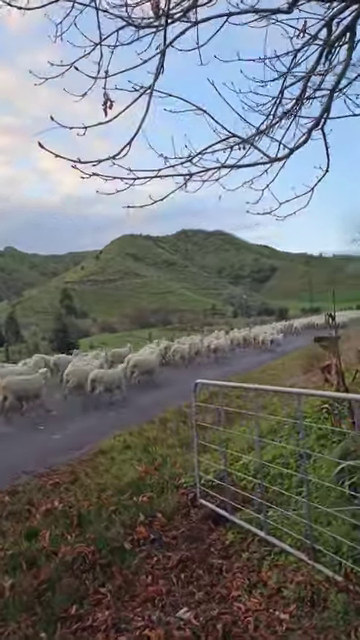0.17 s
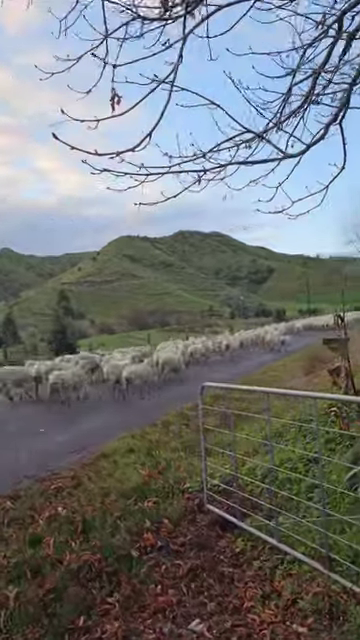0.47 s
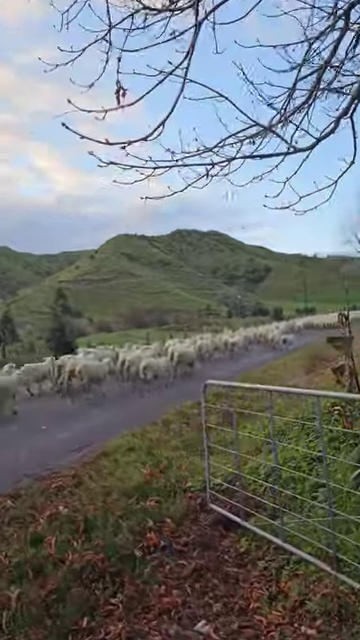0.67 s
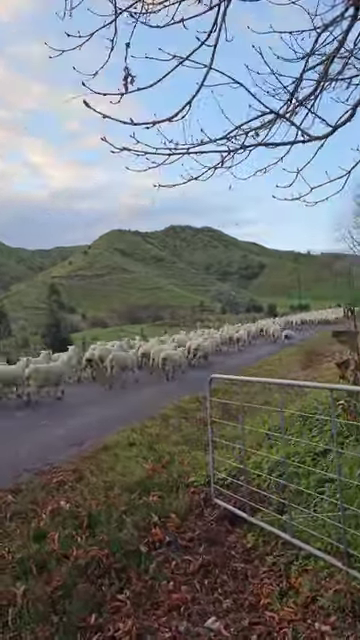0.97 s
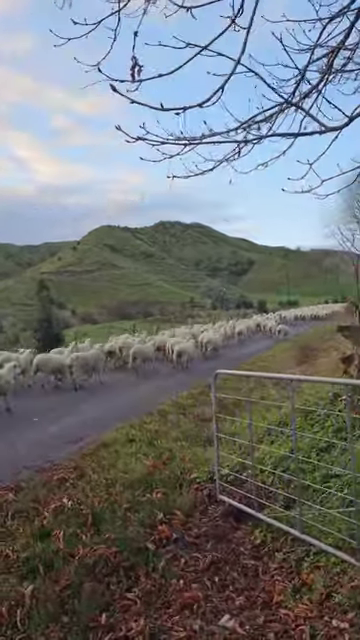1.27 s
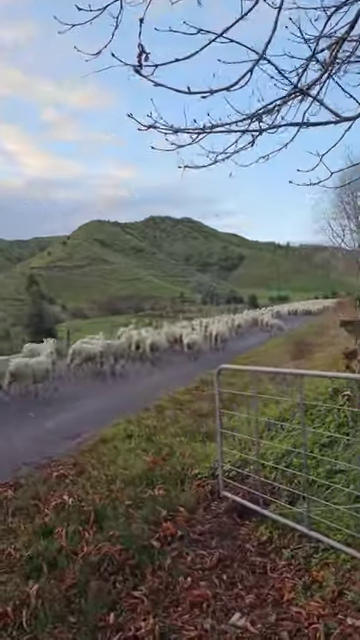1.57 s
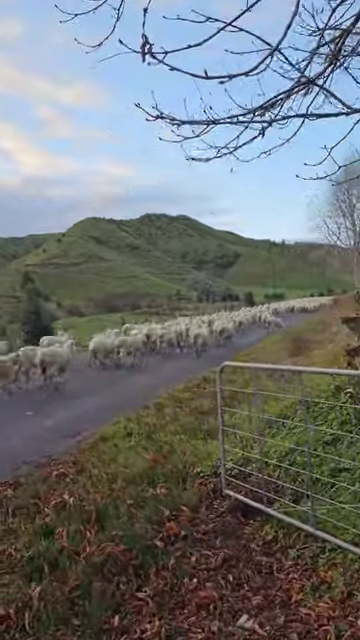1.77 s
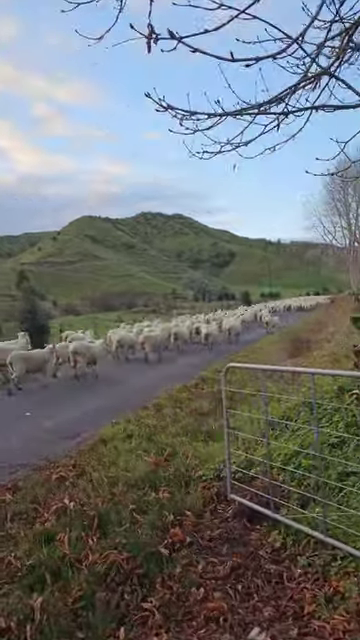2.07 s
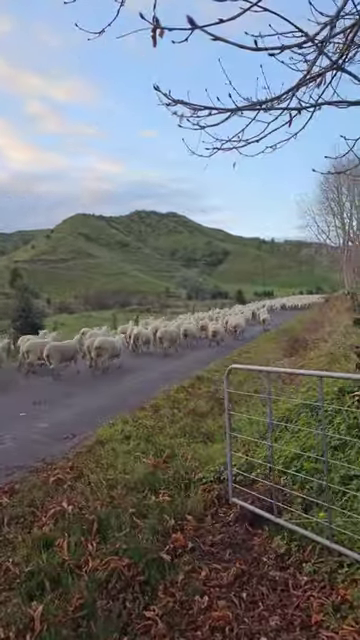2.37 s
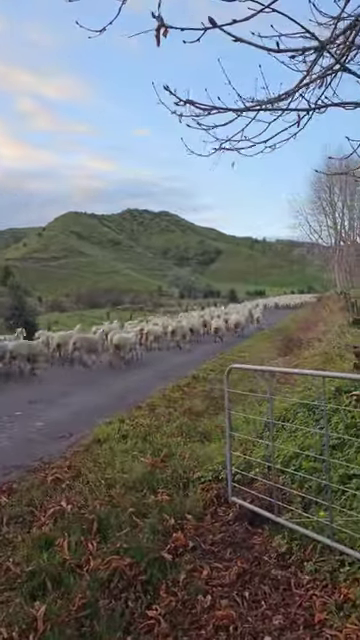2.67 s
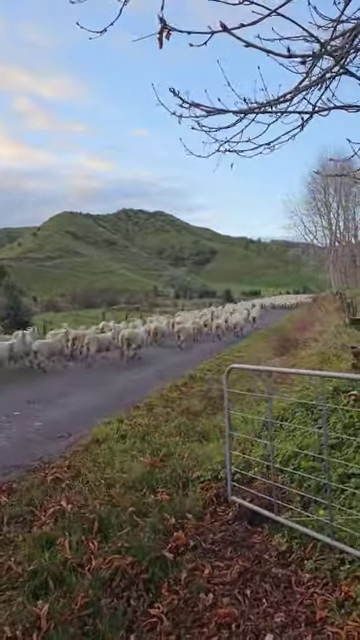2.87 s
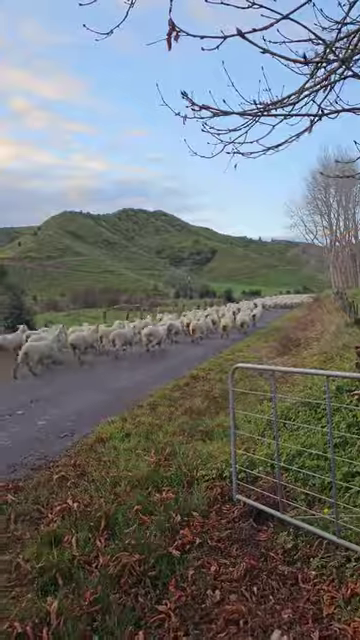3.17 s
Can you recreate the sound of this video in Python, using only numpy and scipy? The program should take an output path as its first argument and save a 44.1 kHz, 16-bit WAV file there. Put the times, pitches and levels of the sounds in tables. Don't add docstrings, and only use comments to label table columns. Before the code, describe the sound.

Sheep hooves patter in a dense clopping flock along an asphalt lane over low engine rumble.

```python
import sys
import numpy as np
from scipy import signal
from scipy.fft import rfft, irfft, next_fast_len
from scipy.io import wavfile
from scipy.ndimage import map_coordinates

SR = 44100
rng = np.random.default_rng(int(sys.argv[2]) if len(sys.argv) > 2 else 0)


def how_loud(loudness_db):
    steps = np.asarray(loudness_db, float) / 20
    return 10 ** steps


def digitize_waveform(pressure):
    field = np.atleast_2d(pressure).T
    bounded = np.clip(field, -1, 1)
    quanta = np.round(bounded * 32767).astype(np.int16)
    wavfile.write(sys.argv[1], SR, quanta)


N = 145971
HOOF_LATE_S = .0008


def unit(x):
    return x / np.sqrt(np.mean(x ** 2) + 1e-20)


def along(points, hz):
    f, v = np.transpose(points)
    return np.interp(np.log(hz + 1), np.log(f + 1), v)


def curves(rows):
    s, *cols = np.transpose(rows)
    return [np.interp(np.arange(N) / SR, s, c) for c in cols]


def wobble(rate):
    knots = rng.standard_normal(int(N * rate / SR) + 4)
    return map_coordinates(knots, [np.arange(N) * rate / SR])


def filtered(x, response):
    m = next_fast_len(N + SR // 2)
    return irfft(rfft(x, m) * response(np.fft.rfftfreq(m, 1 / SR)), m)[..., :N]


def coloured(spectrum, channels):
    noise = rng.standard_normal((channels, N))
    return unit(filtered(noise, lambda hz: how_loud(along(spectrum, hz))))


def clops(s, gain, hz, cycles, rise_s):
    t = np.arange(600)[None] / SR
    fall = how_loud(-30 * (t * hz[:, None] / cycles) ** 1.12)
    rise = 1 - np.exp(-t / rise_s)
    rings = gain[:, None] * np.sin(2 * np.pi * hz[:, None] * t) * fall * rise
    at = np.round(s * SR).astype(int)[:, None] + np.arange(t.size)
    return np.bincount(at.ravel(), rings.ravel(), N + t.size)[:N]


def stroke(rows):
    t = np.arange(N) / SR
    level = 0
    for s, db, length in rows:
        ramp = np.minimum(t - s, (s + length - t) / 2) * 6 / length
        level = level + how_loud(db) * np.clip(ramp, 0, 1)
    return level


# frequency in Hz, left over right in dB.
SHADOW = [(60, -8), (180, 2), (550, -1), (1650, -2.5), (4970, -5), (15000, -2)]


def placed(x, lag_s, shadow):
    def half(hz):
        return how_loud(shadow * along(SHADOW, hz) / 2) * np.exp(-1j * np.pi * hz * lag_s)
    return filtered(x, lambda hz: np.array([half(hz), 1 / half(hz)]))


# time in seconds, shaft speed in Hz, exhaust tone in dB, low rumble in dB.
ENGINE_RUN = [(0, 28.36, -54.5, -42.5), (.35, 28.92, -47, -39.5), (.7, 29.86, -47, -41.5),
              (1.05, 30.52, -47.5, -38.5), (1.4, 31.36, -45.5, -42.5), (1.75, 32.25, -46.5, -40.5),
              (2.15, 33.04, -43, -39), (2.4, 33.47, -48, -40.5), (2.7, 33.84, -44.5, -38),
              (3, 34.62, -45.5, -40.5), (3.31, 35.18, -46, -40)]
# multiple of shaft speed, level over the fourth in dB, unsteadiness in dB.
ENGINE_ORDERS = [(1.5, -5.5, -2.5), (2, -1, 2), (2.5, -4, -2), (3, -4.5, 1), (4, 0, 2), (5, -8.5, 2.5),
                 (6, -20, 8), (7, -19.5, 5)]
# frequency in Hz, density in dB per Hz.
RUMBLE_COLOUR = [(12, -50), (20, -15.5), (49, 3), (80, 0.5), (138, -5), (198, -12), (261, -12.5),
                 (331, -27.5), (400, -32.5), (520, -28), (880, -120)]


def engine():
    hz, exhaust_db, low_db = curves(ENGINE_RUN)
    turn = 2 * np.pi * np.cumsum(hz) / SR
    tones = 0
    for multiple, db, sway_db in ENGINE_ORDERS:
        base_db = exhaust_db if multiple > 3.5 else low_db - 5
        level = how_loud(base_db + db + sway_db * wobble(4.23)) * np.sqrt(2)
        tones = tones + level * np.sin(multiple * turn + rng.uniform(0, 2 * np.pi))
    rumble_db = -3 + .6 * low_db + .4 * low_db.mean()
    mid, side = coloured(RUMBLE_COLOUR, channels=2) * how_loud(rumble_db)
    side = side * how_loud(-17)
    return tones + np.array([mid + side, mid - side])


# frequency in Hz, density in dB per Hz.
GRIT_COLOUR = [(120, -16.5), (200, -8), (879, -12.5), (1310, -14), (4990, -19), (7470, -22), (10400, -26),
               (14700, -24.5), (15800, -30)]


def herd(count):
    draw = rng.random((count, 4))
    s = draw[:, 0] * N / SR
    clop_hz = 923 * np.exp(0.57 * 3.28 * (draw[:, 2] - .5))
    hollow = unit(clops(s, how_loud(9 * draw[:, 1] ** 2), clop_hz, cycles=1.02, rise_s=.0004))

    t = np.arange(SR // 10) / SR
    hits = np.bincount((s * SR).astype(int), how_loud(9.6 * draw[:, 2] ** 2.5), N)
    rub_shape = np.exp(-((t - .03) * 5 / .022) ** 2)
    bursts = signal.fftconvolve(hits, rub_shape)[:N] * how_loud(1.9 * wobble(400))
    rub = unit(bursts * coloured(GRIT_COLOUR, channels=1)[0])

    tick_s = (s + .004) % (N / SR)
    tick_hz = 1830 * np.exp(1.1 * (draw[:, 1] - .5))
    tick = unit(clops(tick_s, how_loud(10 * draw[:, 3] ** 2.5), tick_hz, cycles=2.2, rise_s=.0002))
    return how_loud(-3) * tick + how_loud(-1.5) * hollow + how_loud(1) * rub


# time in seconds, level in dB.
FLOCK_LEVEL = [(0, -55), (.2, -55.5), (.45, -56), (.65, -56), (.9, -55.5), (1.15, -54.5), (1.4, -54),
               (1.62, -57.5), (1.85, -53), (2.1, -53.5), (2.35, -53.5), (2.55, -52.5), (2.8, -52.5),
               (2.97, -55), (3.15, -52), (3.31, -54)]
# left lag in seconds, share in dB, strength of the shadow as a factor.
HERD_SIDES = [(.0005, -2.5, 3.06), (.00011, 1.5, 0.093), (-.0002, 0, 0.18)]


def flock():
    level_db, = curves(FLOCK_LEVEL)
    crowd = sum(how_loud(db) * placed(herd(count=380), lag_s, shadow) for lag_s, db, shadow in HERD_SIDES)

    def alike(hz):
        return 1 / (1 + (hz / 1560) ** 2)

    def diffuse(hz):
        return np.sqrt(1 - alike(hz)) * how_loud(np.outer([.5, -.5], along(SHADOW, hz)))

    far = filtered(coloured(GRIT_COLOUR, channels=2), diffuse)
    common = filtered(coloured(GRIT_COLOUR, channels=1)[0], lambda hz: np.sqrt(alike(hz)))
    far = far + placed(common, 0.00053, 0.74)
    return how_loud(level_db + 0.7 * wobble(14)) * (0.57 * crowd + how_loud(1) * far)


# start in seconds, peak in dB, pitch in Hz.
EDGE_TICKS = [(0.0463, -39, 2900), (0.0722, -37, 2970), (0.14, -39, 3190), (0.3224, -40, 3200),
              (0.5312, -37, 3030), (0.7083, -36, 3030), (0.7527, -36, 3100), (0.841, -41, 3000),
              (0.9183, -35, 3120), (1.0774, -37, 4020), (1.1308, -42, 3270), (1.163, -35, 3070),
              (1.284, -44, 2900), (1.3053, -35, 2980), (1.3912, -32, 3130), (1.5369, -41, 2860),
              (1.626, -36, 3130), (1.6955, -31, 2995), (1.739, -34, 4170), (1.745, -36, 4240),
              (1.8547, -33, 3400), (1.9485, -54, 2500), (2.0797, -38, 3600), (2.3526, -46, 3170),
              (2.385, -21, 4333), (2.4524, -32, 3600), (2.5073, -39, 2650), (2.6045, -31, 3860),
              (2.667, -34, 2990), (2.7003, -41, 3170), (2.7154, -44, 3523), (2.7724, -36, 3100),
              (2.7923, -40, 2990), (2.8105, -33.5, 2920), (2.8448, -52, 3940), (2.8647, -41, 4430),
              (2.8777, -32, 3180), (2.9814, -38.5, 2860), (3.046, -33, 3080), (3.083, -36, 2840),
              (3.1133, -43, 3430), (3.1554, -34, 2510), (3.1841, -35, 2920)]
# start in seconds, peak in dB.
STONE_SNAPS = [(0.1506, -50), (0.7097, -32.5), (0.8046, -40), (0.8255, -31), (0.8407, -31), (1.0844, -43),
               (1.0999, -31), (1.2855, -50), (1.3912, -42), (1.7395, -46), (1.931, -38), (1.949, -40),
               (2.101, -32), (2.152, -34), (2.256, -40), (2.3595, -41), (2.385, -22), (2.5375, -31),
               (2.6628, -48), (2.8649, -43), (2.9173, -44), (3.0031, -32), (3.1136, -34), (3.2313, -38)]


def ticks():
    s, db, hz = np.transpose(EDGE_TICKS)
    s = s + HOOF_LATE_S
    ring = clops(s, how_loud(db + 5), hz, cycles=4, rise_s=.0003)
    click = clops(s, how_loud(db + 6), 1.4 * hz, cycles=2, rise_s=.0002)
    s, db = np.transpose(STONE_SNAPS)
    snap_hz = 7600 * np.exp(0.053 * rng.standard_normal(len(s)))
    snap = clops(s + HOOF_LATE_S, how_loud(db + 3), snap_hz, cycles=6, rise_s=0.00022)
    return placed(ring + click, .0001, 1.5) + placed(snap, .00016, 1.8)


# start in seconds, peak in dB, share of fine grit from 0 to 1.
GRIT_SCUFFS = [(0.1508, -53, 0.2), (0.808, -47, 0.55), (0.9163, -57, 0.17), (1.1, -49, 0.54),
               (1.162, -42, 0.5), (1.286, -41.5, 0.94), (1.305, -39, 0), (1.392, -45, 0.1),
               (1.854, -39, 0.2), (1.9492, -42, 0.65), (2.08, -41, 0.2), (2.1025, -55, 0.7),
               (2.1505, -33, 0.43), (2.36, -37, 0.55), (2.383, -41, 0.8), (2.664, -39.5, 0.7),
               (2.865, -39, 0.16), (2.92, -48, 1), (3.0006, -52, 0.78), (3.047, -40, 0.33),
               (3.1142, -36, 0.24), (3.2298, -35.5, 0.7)]
# start in seconds, level in dB, length in seconds, share of fine grit from 0 to 1.
HOOF_DRAGS = [
    (1.7305, -38.5, .024, .3),
    (1.752, -47, .015, .4),
    (.39, -58, .2, 1),
    (2.42, -53, .15, .9),
    (2.27, -56, .06, .6),
    (1.698, -53, .016, .05),
]


def rubs():
    t = np.arange(N) / SR

    def band(lo_hz, hi_hz):
        grit = coloured(GRIT_COLOUR, channels=1)[0]
        return unit(filtered(grit, lambda f: f ** 3 / (f ** 3 + lo_hz ** 3) / (1 + (f / hi_hz) ** 3)))

    coarse, fine, dull = band(2700, 5600), band(7500, 18000), band(350, 1800)

    def mix(share):
        return (1 - share) * coarse + share * fine

    crackle = unit(how_loud(3.5 * wobble(700)))
    quick = 0
    for s, db, share in GRIT_SCUFFS:
        length_s = .007 / how_loud(.5 * (db + 45.5))
        quick = quick + how_loud(db) * np.exp(-((t - s - .002) * 2 / length_s) ** 2) * mix(share)
    drags = 0
    for s, db, length, share in HOOF_DRAGS:
        drags = drags + stroke([(s, db, length)]) * (mix(share) + (1 - share) * how_loud(3) * dull)
    return placed(how_loud(-4) * quick * crackle, .00012, 1.7) + placed(drags * crackle ** .7, .00051, 2.3)


# start in seconds, peak in dB, pitch in Hz.
NEAR_KNOCKS = [(0.233, -42, 1130), (0.2652, -36, 2140), (0.305, -32, 1280), (0.3723, -45, 1360),
               (0.3953, -37, 1600), (1.0141, -39.5, 1240), (1.2588, -27.5, 1070), (1.2997, -29, 1120),
               (1.3128, -37, 2120), (1.3149, -29, 1180), (1.3236, -33, 1250), (1.3472, -39, 1210),
               (1.3595, -31.5, 1230), (1.5238, -42.5, 1280), (1.6768, -42, 1550), (1.6884, -36.5, 1250),
               (1.806, -41.5, 1330), (2.0823, -38, 1150), (2.1331, -35, 1180), (2.1515, -36, 1190),
               (2.16, -40, 1520), (2.1641, -37, 1450), (2.189, -36, 1296), (2.217, -34.5, 1360),
               (2.2554, -18.5, 1440), (2.4515, -40, 1340), (2.6045, -39.5, 1292), (2.8642, -39, 1319),
               (3.076, -42, 1410), (3.1146, -34.5, 1330)]
# start in seconds, peak in dB, pitch in Hz.
LIGHT_TAPS = [(0.345, -45, 1020), (0.38, -44, 1550), (0.663, -42, 1310), (0.697, -46, 1350),
              (0.751, -55, 1270), (1.077, -42, 1300), (1.283, -38, 1190), (1.47, -57, 867),
              (1.606, -46, 1510), (1.647, -44.5, 1280), (1.948, -40, 982), (2.039, -44, 1230),
              (2.052, -38, 1956), (2.168, -32.5, 1530), (2.3, -46, 1340), (2.36, -45, 1350),
              (2.473, -42, 1380), (2.497, -45, 1280), (2.511, -43, 894), (2.536, -51, 996),
              (2.616, -43, 895), (2.682, -55, 860), (2.701, -58, 892.4), (2.775, -43, 1020),
              (3.045, -41, 1350)]
# start in seconds, peak in dB, pitch in Hz.
LOW_THUDS = [(0.884, -33, 540), (0.915, -35, 528), (1.188, -33, 525), (1.258, -39, 530), (1.647, -33, 525),
             (1.739, -51, 507), (1.013, -33, 242), (1.107, -40.5, 243), (0.784, -38, 256),
             (2.021, -37, 243), (2.126, -34.5, 436), (2.615, -51, 510.5), (2.773, -35, 520),
             (2.863, -29.5, 527), (3.076, -31, 443), (3.222, -31, 543)]
# start in seconds, level in dB, length in seconds.
KNOCK_RATTLES = [
    (.22, -59, .2),
    (1.25, -56, .17),
    (2.04, -54, .2),
    (3.03, -58, .15),
]


def knocks():
    s, db, hz = np.transpose(NEAR_KNOCKS + LIGHT_TAPS)
    s = s + HOOF_LATE_S
    cycles = 4 - .12 * np.clip(db + 36, 0, 30)[:, None]
    ring = clops(s, how_loud(db + 15), hz, cycles, rise_s=.001 * (cycles / 4) ** 2)
    tick = clops(s, how_loud(db - 6), 2.8 * hz, cycles=5, rise_s=.0005)
    body = clops(s, how_loud(db), .45 * hz, cycles=1.3, rise_s=.0003)

    draw = rng.random((900, 3))
    small_hz = 1000 + 1000 * draw[:, 2] ** 2
    small = unit(clops(draw[:, 0] * N / SR, how_loud(9 * draw[:, 1] ** 2), small_hz, cycles=2.5, rise_s=.0004))
    rattle = stroke(KNOCK_RATTLES) * small

    s, db, hz = np.transpose(LOW_THUDS)
    thud = clops(s, how_loud(db + 1), hz, cycles=3, rise_s=0.00031)
    return placed(ring + tick - body + rattle + thud, .00052, 1.4)


def lane(x):
    t = np.arange(SR // 4) / SR
    tail = rng.standard_normal((2, t.size)) * how_loud(-60 * t / .05) * (t > .002)
    return signal.fftconvolve(x, tail / np.linalg.norm(tail[0]), axes=1)[:, :N]


def scene():
    near = ticks() + rubs() + knocks()
    return engine() + flock() + near + how_loud(-20) * lane(near)


def band_limit(x):
    return signal.sosfilt(signal.butter(12, 15830, fs=SR, output="sos"), x)


# centre in Hz, width in Hz, left gain, right gain (both as factors).
PORT_RESONANCES = [(3100, 490, 0.81, 0.66), (7560, 760, 0.25, 1.07), (11630, 580, 0.23, 0.87)]


def record(dry):
    def port(f):
        response = 1
        for centre, width, left, right in PORT_RESONANCES:
            peak = 1j * f * width / (centre * centre - f * f + 1j * f * width)
            response = response + np.outer([left, right], peak)
        return response * (f < 15850)
    return band_limit(filtered(dry, port))


dry = scene()
out = record(dry)
digitize_waveform(out)
```